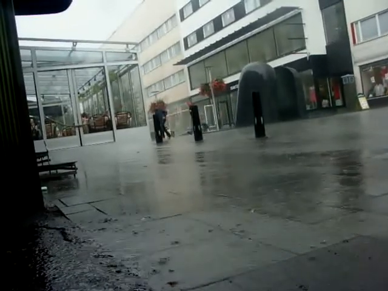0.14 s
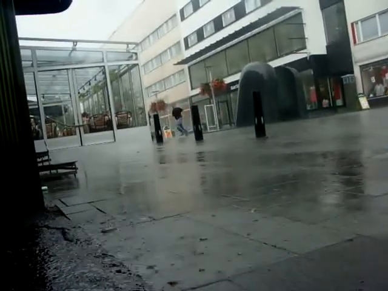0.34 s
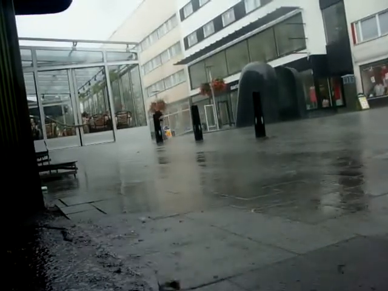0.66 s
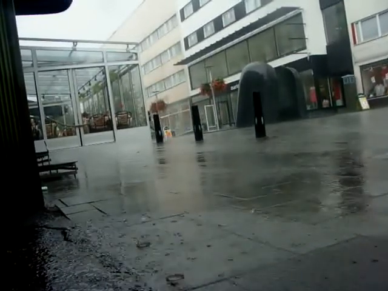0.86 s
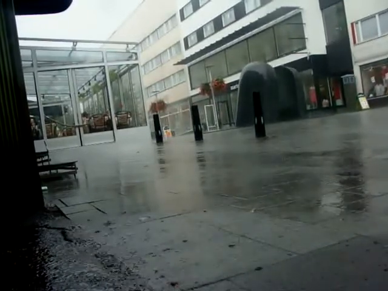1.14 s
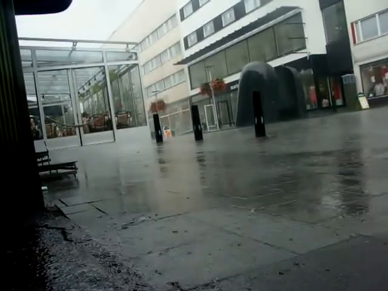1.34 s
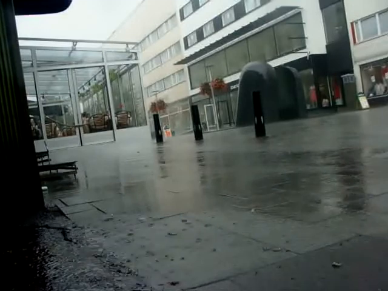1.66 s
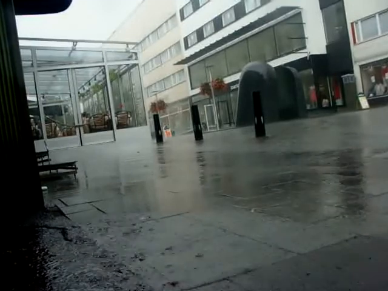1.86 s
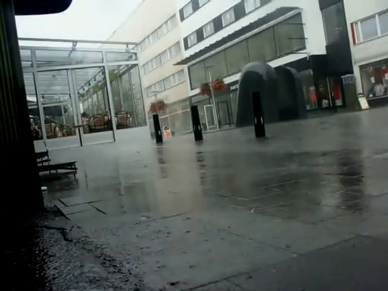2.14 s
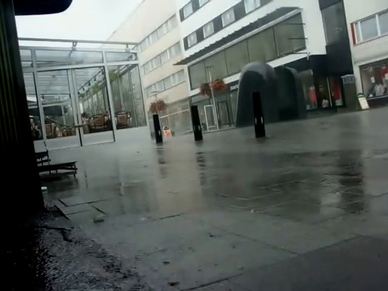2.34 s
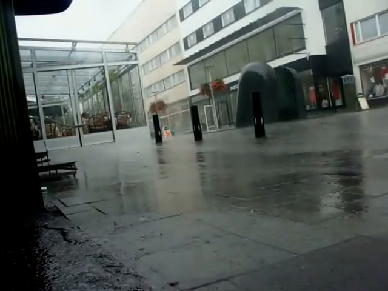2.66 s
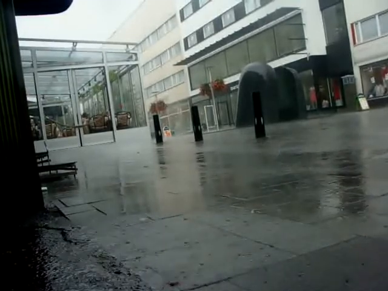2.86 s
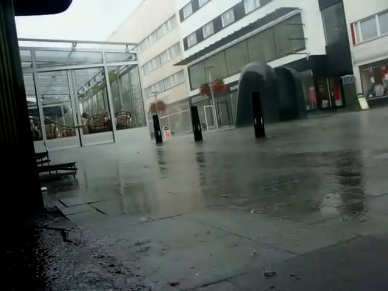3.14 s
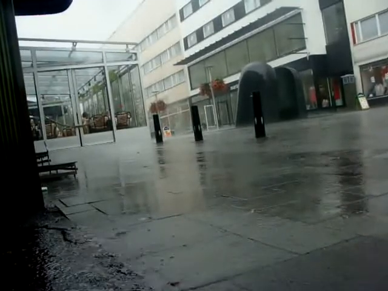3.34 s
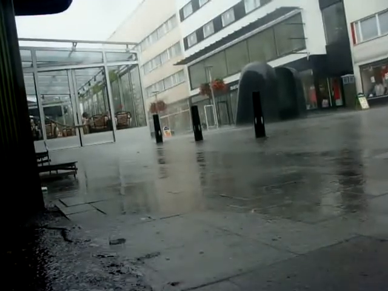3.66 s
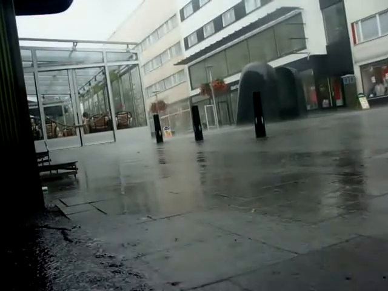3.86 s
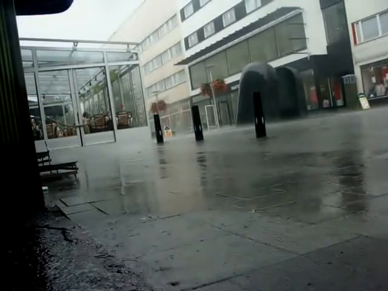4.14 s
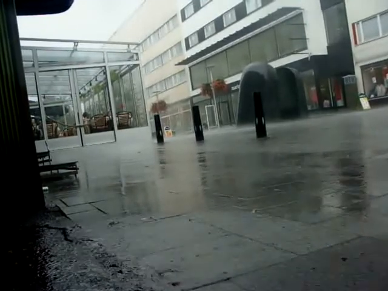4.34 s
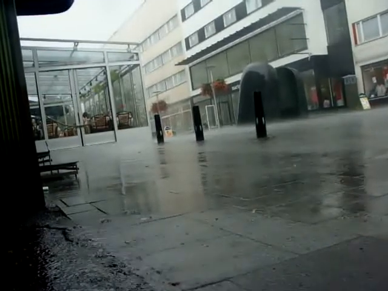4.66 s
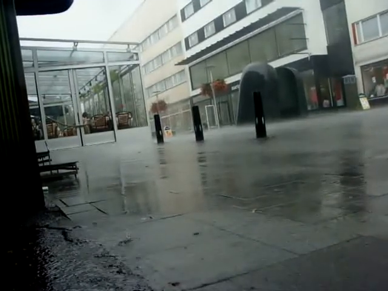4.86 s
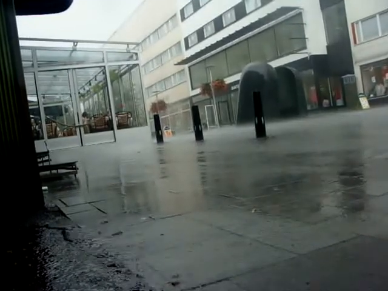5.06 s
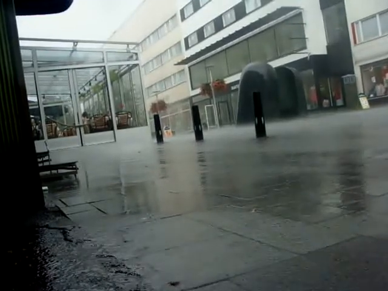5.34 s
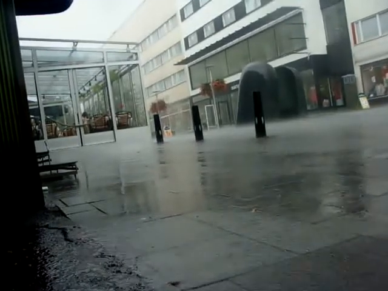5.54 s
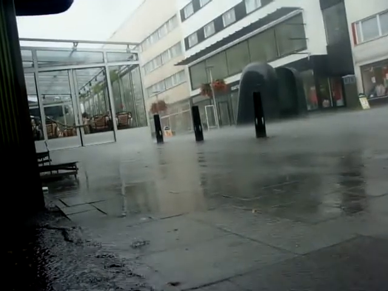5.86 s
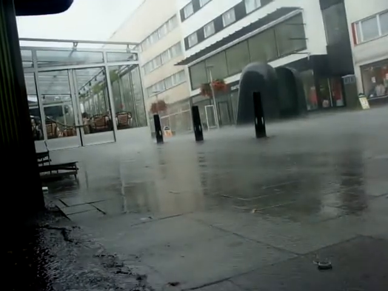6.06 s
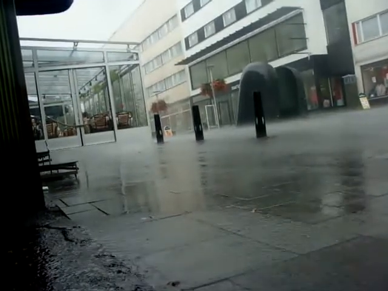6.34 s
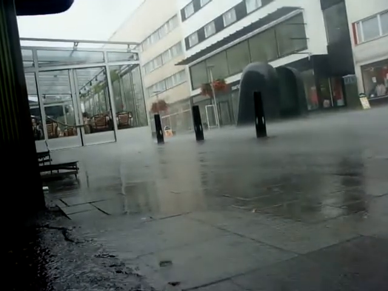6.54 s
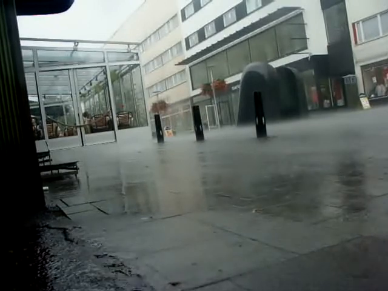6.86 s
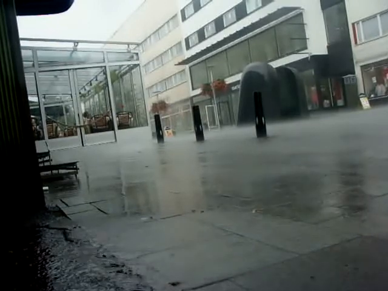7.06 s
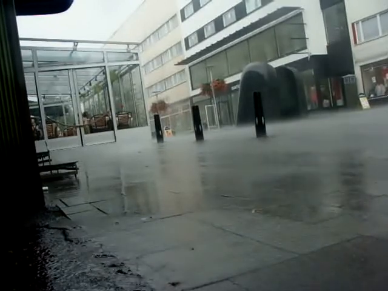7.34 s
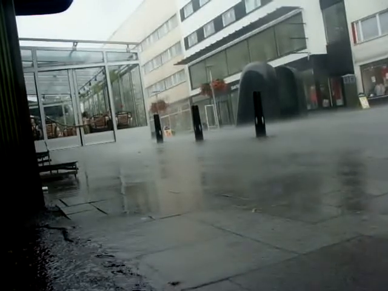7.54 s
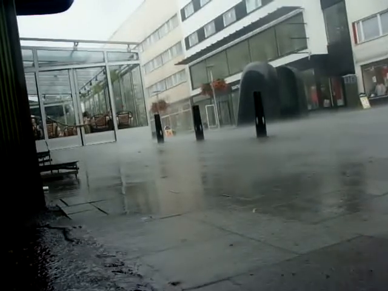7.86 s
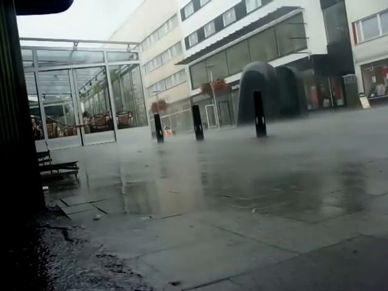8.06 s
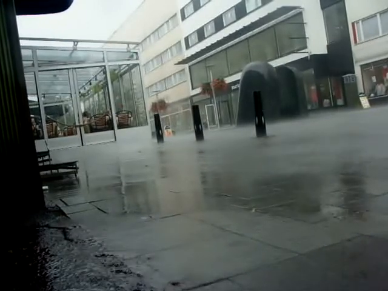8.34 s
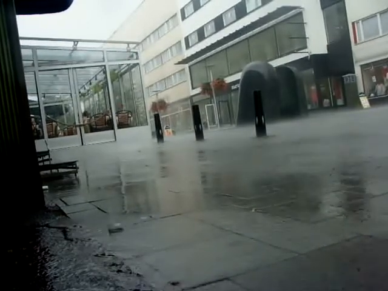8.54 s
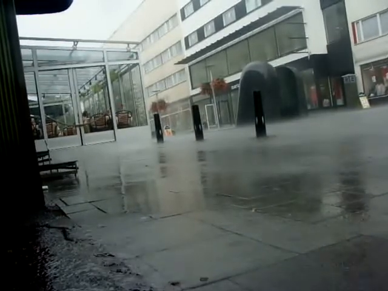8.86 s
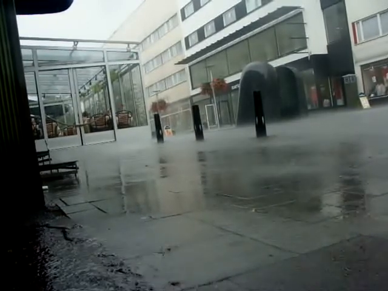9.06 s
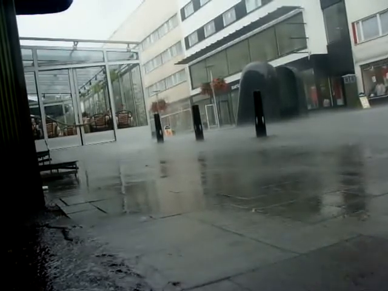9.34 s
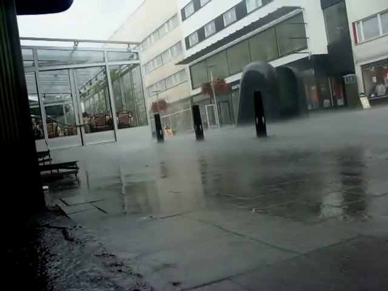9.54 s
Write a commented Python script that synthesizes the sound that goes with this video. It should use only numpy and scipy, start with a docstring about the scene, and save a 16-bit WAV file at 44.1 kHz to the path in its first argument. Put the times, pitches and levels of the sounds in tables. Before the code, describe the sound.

Torrential rain hammers a flooded paved square, a steady hissing wash with crisp close splashes, bubbly plinks and a brief dull far rumble.

```python
"""A cloudburst on a flooded paved square between tall buildings, in mono from close to the ground.
From the start, filtered noise gives the wash and low roar of far drops; random ringing impacts, fizz and
rising bubble tones give near rain, with short gushes, slaps and plinks. Stray drops tick on the microphone
housing near 2.7, 4.9 and 8 s. A dull far rumble swells once from 5.65 s and dies by 8.6 s.
The rain grows heavier toward the end."""
import sys
import numpy as np
from scipy import signal
from scipy.fft import rfft, irfft, next_fast_len
from scipy.io import wavfile

SR = 44100
rng = np.random.default_rng(int(sys.argv[2]) if len(sys.argv) > 2 else 0)


def dump(signal):
    """Clip the signal to [-1, 1] and save it as 16-bit WAV at the path in sys.argv[1]."""
    limited = np.clip(np.atleast_2d(signal).T, -1, 1)
    pcm = np.round(limited * 32767).astype(np.int16)
    wavfile.write(sys.argv[1], SR, pcm)


N = 427329

# clumps of big drops landing in the near puddles: start_s, length_s, strength_db, pitch_hz
GUSH_TABLE = [(.66, .08, -6, 4500), (0.929, .05, 0, 4300), (1.292, 0.091, -3, 4900), (1.56, .1, -3, 4800),
              (2.08, 0.053, -3, 5400), (2.27, .08, -7, 5500), (3.142, 0.11, -3, 5000),
              (3.37, 0.066, -6, 4000), (4.018, .08, -2.5, 5170), (4.37, .05, -3, 4600),
              (4.529, 0.1, -1.5, 4400), (5.218, .12, -4.5, 4800), (7.401, 0.15, -4, 5500),
              (7.992, 0.056, 0, 5200), (8.24, 0.086, -3, 4880), (9.088, 0.064, -3, 4000)]


def from_db(db):
    """Decibels to amplitude gain."""
    return 10 ** (np.asarray(db) / 20)


def rms_one(x):
    """Scale to an rms of 1."""
    return x / np.sqrt(np.mean(x ** 2) + 1e-20)


def in_time(rows):
    """Interpolate each column of a curve, sample by sample."""
    time_s, *columns = np.transpose(rows)
    return [np.interp(np.arange(N) / SR, time_s, column) for column in columns]


def coloured(x, spectrum):
    """Filter to a smooth spectrum with falling skirts beyond its ends; rms 1."""
    hz, db = np.transpose(spectrum)
    size = next_fast_len(N)
    bins_hz = np.maximum(np.arange(size // 2 + 1) * SR / size, 1)
    gain = from_db(np.interp(np.log(bins_hz), np.log(hz), db))
    skirts = np.minimum(bins_hz / hz[0], 1) ** 2 * np.minimum(hz[-1] / bins_hz, 1) ** 2
    return rms_one(irfft(rfft(x, size) * gain * skirts, size)[:N])


def dying(t60_s):
    """Time axis and envelope of an exponential decay through 60 dB."""
    t = np.arange(int(t60_s * SR) + 2) / SR
    return t, np.exp(-np.log(1000) * t / t60_s)


def swell(rise_s):
    """A pulse that reaches 1 after rise_s and then dies away."""
    t = np.arange(SR // 20) / SR
    return t / rise_s * np.exp(1 - t / rise_s)


def surge(start_s, attack_s, hold_s, release_s):
    """An envelope that rises to 1, holds and falls back to silence."""
    corners_s = start_s + np.cumsum([0, attack_s, hold_s, release_s])
    return np.interp(np.arange(N) / SR, corners_s, [0, 1, 1, 0])


def add(track, start_s, sound):
    """Mix a short sound into a track at start_s."""
    start = int(np.clip(start_s * SR, 0, N - 1))
    track[start:start + len(sound)] += sound[:N - start]


def ring(clicks, hz, t60_s):
    """A two-pole resonator: a unit click sets a decaying sine of starting height 1 ringing."""
    radius = from_db(-60 / (t60_s * SR))
    angle = 2 * np.pi * hz / SR
    feedback = [1, -2 * radius * np.cos(angle), radius * radius]
    return signal.lfilter([0, np.sin(angle)], feedback, clicks + 1e-18)


def bubble(hz, t60_s):
    """A trapped bubble rings and climbs by a quarter in pitch, levelling off as it reaches the surface."""
    t, envelope = dying(t60_s)
    pitch_hz = hz * (1 + np.tanh(6 * t / t60_s) / 4)
    return envelope * np.sin(2 * np.pi * np.cumsum(pitch_hz) / SR)


def slap(hz, rise_cycles, fizz_db, fizz_t60_s=0.0092):
    """An impact rings for a few cycles and leaves a brief fizz of droplets."""
    envelope = swell(rise_cycles / hz)
    t = np.arange(len(envelope)) / SR
    fizz = rms_one(ring(rng.standard_normal(len(t)), hz, 8 / hz))
    fizz = fizz * from_db(-60 * t / fizz_t60_s)
    return envelope * np.sin(2 * np.pi * hz * t) + from_db(fizz_db) * fizz


def drops(per_s, spread_db, largest_db, low_hz, high_hz, cycles, fizz_share, fizz_t60_s, count=12):
    """Random impacts of unequal size and pitch, each ringing a few cycles and trailed by fizz."""
    falls = rng.random(N) < per_s / SR
    sizes_db = np.minimum(spread_db * rng.exponential(1, N), largest_db)
    sizes = falls * from_db(sizes_db) * rng.choice([-1, 1], N)
    dealt = rng.integers(0, count, N)  # which pitch each drop gets
    impacts = np.zeros(N)
    for k, hz in enumerate(np.geomspace(low_hz, high_hz, count)):
        impacts += ring(sizes * (dealt == k), hz, cycles / hz) * hz  # higher rings start taller
    fizz_power = signal.fftconvolve(sizes ** 2, dying(fizz_t60_s)[1] ** 2)[:N]
    fizz = np.sqrt(np.maximum(fizz_power, 0)) * rng.standard_normal(N)
    return np.sqrt(1 - fizz_share) * rms_one(impacts) + np.sqrt(fizz_share) * rms_one(fizz)


def far_rumble():
    """A dull swell of low noise beyond the square: it rises once, holds and dies away."""
    # pitch_hz, density_db (relative, per Hz)
    rumble_spectrum = [(70, -21), (115, -1), (145, 4), (175, -2.5), (240, -21)]
    envelope = surge(start_s=5.65, attack_s=0.52, hold_s=0.28, release_s=2.1)
    return from_db(-36.5) * envelope * coloured(rng.standard_normal(N), rumble_spectrum)


def far_rain(wash_db):
    """Drops too many to tell apart: a bright noise wash from the paving and a low roar from the roofs."""
    # both: pitch_hz, density_db (relative, per Hz)
    roar_spectrum = [(25, -26), (45, -17.5), (80, -11), (135, -4), (190, 0), (228, 0.2), (262, -4),
                     (310, -8), (420, -22.5), (600, -41)]
    wash_spectrum = [(260, -20), (350, -1), (430, 0.25), (530, -1), (600, -4), (700, -2.5), (1050, -1),
                     (1190, -2.5), (1400, -0.75), (1800, -1), (2700, -0.5), (4000, -2.5), (5500, -5.5),
                     (6800, -14.5), (10200, -29)]
    wash_trim_db, roar_mean_db = 1.84, -32.5
    roar_db = roar_mean_db + 0.25 * (wash_db - wash_db.mean())  # follows the wash weakly
    wash = from_db(wash_db + wash_trim_db) * coloured(rng.standard_normal(N), wash_spectrum)
    roar = from_db(roar_db) * coloured(rng.standard_normal(N), roar_spectrum)
    return wash + roar


def splashing(spray_db):
    """Level of the near puddles in dB: it follows the spray, and every gush adds a short surge of power."""
    mean_db, db_per_spray_db = -30.8, 1.3
    gush_db, attack_s, release_s = -26.5, 0.021, 0.05  # level of a gush of strength 0
    power = from_db(mean_db + db_per_spray_db * (spray_db - spray_db.mean())) ** 2
    for start_s, length_s, strength_db, _ in GUSH_TABLE:
        envelope = surge(start_s - attack_s, attack_s, length_s, release_s)
        power = power + (from_db(gush_db + strength_db) * envelope) ** 2
    return 10 * np.log10(power)


def near_rain(splash_db, spray_db):
    """Heavy drops splash in the water film; small ones prickle on the stone."""
    # both: pitch_hz, gain_db (relative)
    splash_spectrum = [(900, -17), (2500, 0.5), (4000, -1), (5400, 0.5), (6500, -7), (8000, -15),
                       (10200, -15)]
    spray_spectrum = [(2500, -14), (4500, -8.5), (6000, 1), (7500, -1), (10200, -5)]
    spray_trim_db = 1.27
    heavy = drops(per_s=500, spread_db=3.5, largest_db=11, low_hz=2500, high_hz=6200,
                  cycles=15, fizz_share=0.45, fizz_t60_s=0.06)
    fine = drops(per_s=1500, spread_db=4.6, largest_db=7, low_hz=5200, high_hz=9700,
                 cycles=16, fizz_share=0.7, fizz_t60_s=0.03)
    splash = from_db(splash_db) * coloured(heavy, splash_spectrum)
    spray = from_db(spray_db + spray_trim_db) * coloured(fine, spray_spectrum)
    return splash + spray


def puddle_bubbles(splash_db, count=1200, low_hz=1500, high_hz=7000, cycles=45, spread_db=1.0, level_db=-6):
    """Small bubbles all over the puddles; the higher the pitch, the shorter the ring."""
    out = np.zeros(N)
    for when, pitch, size in rng.random((count, 3)):
        hz = low_hz * (high_hz / low_hz) ** pitch
        size_db = spread_db * min(-np.log(1 - size), 4)
        add(out, when * N / SR, from_db(size_db) * bubble(hz, cycles / hz))
    return from_db(splash_db + level_db) * out


def housing_hits(push_s=0.0026, spatter_t60_s=0.0094):
    """A drop on the housing gives a bright tick, a spatter and one soft push of pressure at the port."""
    # start_s, level_db, ring_hz, rise_cycles, spatter_db (re level_db), push_db
    hits = [(2.6723, -5, 5400, 1.8, -11, -26), (4.9152, -5.5, 5400, 1.7, -15, -29),
            (7.9795, -6, 5000, 2.0, -6, -25)]
    out = np.zeros(N)
    for start_s, level_db, hz, rise_cycles, spatter_db, push_db in hits:
        add(out, start_s, from_db(level_db) * slap(hz, rise_cycles, spatter_db, spatter_t60_s))
        add(out, start_s, from_db(push_db) * swell(push_s))
    return out


def gush_slaps(per_s=260, spread_octaves=0.16, spread_db=1.5, rise_cycles=1.5):
    """Each gush breaks into a quick run of slaps of unequal size and pitch."""
    slap_db = -17  # typical slap in a gush of strength 0
    out = np.zeros(N)
    for start_s, length_s, strength_db, pitch_hz in GUSH_TABLE:
        for size, pitch in rng.standard_normal((int(per_s * length_s), 2)):
            hit = slap(pitch_hz * 2 ** (spread_octaves * pitch), rise_cycles, fizz_db=-13)
            level_db = slap_db + strength_db + spread_db * size
            add(out, start_s + length_s * rng.random(), from_db(level_db) * hit)
    return out


def nearest_drops():
    """Single slaps and bubble plinks within arm's reach; each slap comes back off a surface close by."""
    # sharp slaps: start_s, level_db, ring_hz, rise_cycles
    slaps = [(.7151, -13.5, 8400, 1.8), (1.5502, -15, 6500, 1.1), (1.6387, -14, 6000, 1.1),
             (2.3416, -15, 7000, 1.1), (2.3534, -12.5, 7000, 1.1), (3.0584, -4, 4600, 1.5),
             (3.6601, -12, 7200, 1.1), (4.468, -15, 8000, 1.1), (5.8028, -15, 6500, 1.1),
             (5.976, -13, 5400, 2.8), (6.1113, -11.5, 7200, 1.3), (6.2078, -3.5, 4200, 2.0),
             (7.0507, -12.5, 8500, 1.1), (7.4169, -13.5, 8000, 1.5), (8.3894, -12, 6500, 1.1),
             (8.8568, -12, 6000, 1.1), (8.896, -12, 7000, 1.1), (9.2668, -11, 5800, 1.5)]
    # big bubbles: start_s, level_db, starting pitch_hz, t60_s
    plinks = [(.6518, -6, 2750, .025), (1.0905, -12, 2800, .022), (1.6395, -14, 4700, .015),
              (3.165, -15, 3850, .018), (4.034, -16, 4850, .018), (8.438, -12, 4900, .015),
              (8.651, -12, 4900, .015)]
    echo_s, echo_db = 0.0028, -8
    out = np.zeros(N)
    for start_s, level_db, hz, rise_cycles in slaps:
        hit = from_db(level_db) * slap(hz, rise_cycles, fizz_db=-22)
        add(out, start_s, hit)
        add(out, start_s + echo_s, from_db(echo_db) * hit)
    for start_s, level_db, hz, t60_s in plinks:
        add(out, start_s, from_db(level_db) * bubble(hz, t60_s))
    return out


def scene():
    """All the rain at one point, alike in both channels."""
    # strength of the downpour: time_s, wash_db, spray_db (both before trims)
    downpour = [(0, -22, -32), (4, -22.0, -31.5), (6.3, -21.5, -31.0), (7.6, -21, -30), (8.7, -20.5, -29),
                (9.69, -19.5, -29.5)]
    wash_db, spray_db = in_time(downpour)
    splash_db = splashing(spray_db)
    far = far_rumble() + far_rain(wash_db)
    near = near_rain(splash_db, spray_db) + puddle_bubbles(splash_db) + gush_slaps() + nearest_drops()
    mono = far + near + housing_hits()
    return np.stack([mono, mono])


def record(dry):
    """The recorder loses the deepest bass, rounds the highest peaks and cuts the top steeply."""
    ceiling, cutoff_hz = 0.72, 10080
    thinned = signal.sosfilt(signal.butter(1, 14, "high", fs=SR, output="sos"), dry)
    rounded = thinned / (1 + (thinned / ceiling) ** 8) ** (1 / 8)
    return signal.sosfilt(signal.ellip(14, 0.1, 80, cutoff_hz, fs=SR, output="sos"), rounded)


dry = scene()
out = record(dry)
dump(out)
```